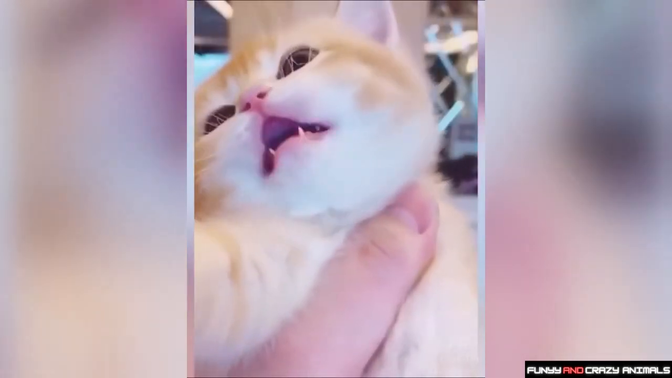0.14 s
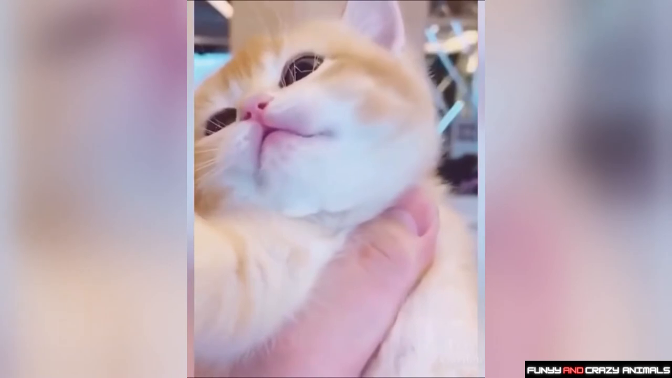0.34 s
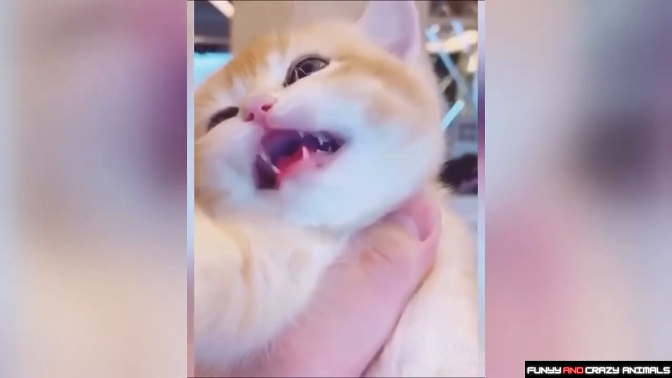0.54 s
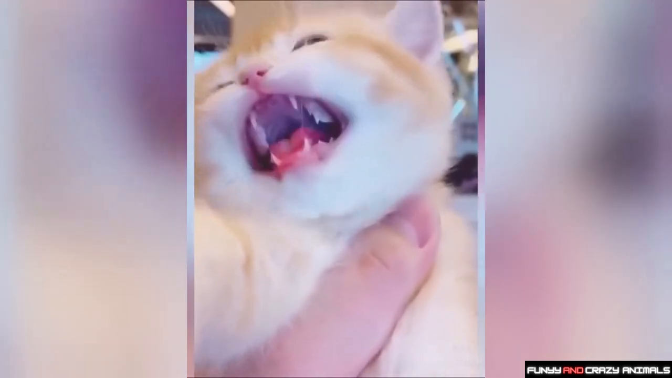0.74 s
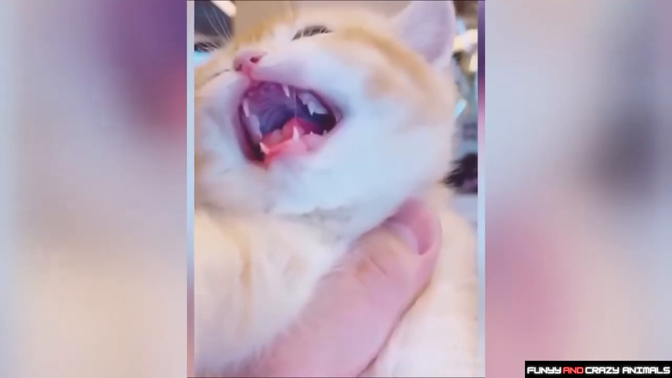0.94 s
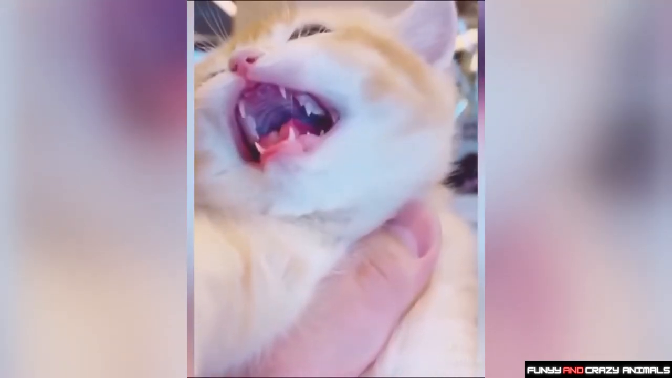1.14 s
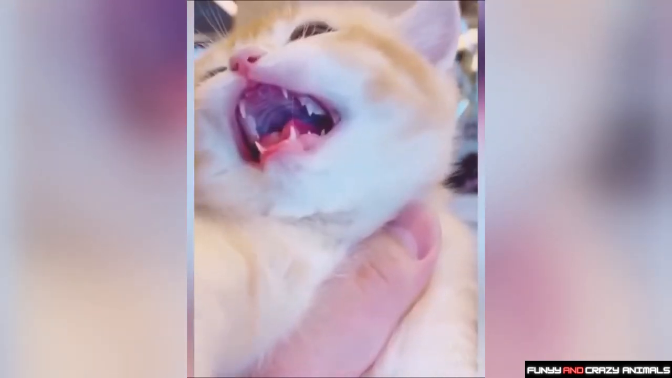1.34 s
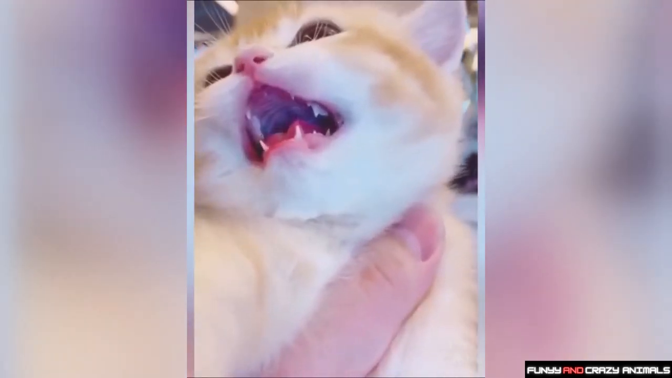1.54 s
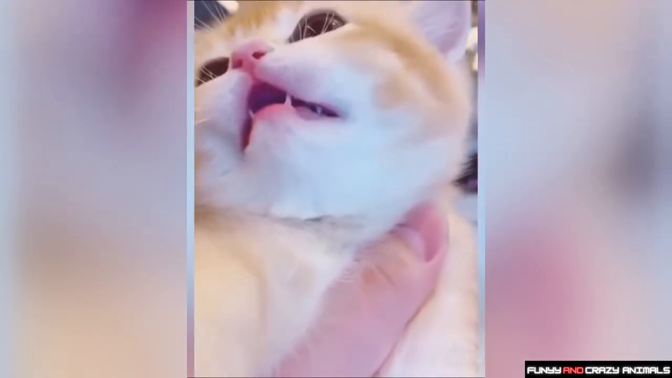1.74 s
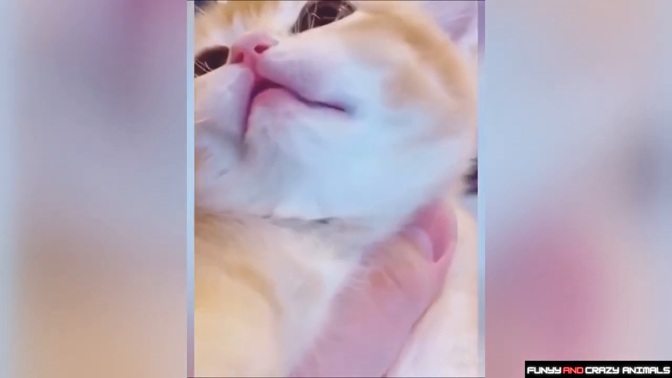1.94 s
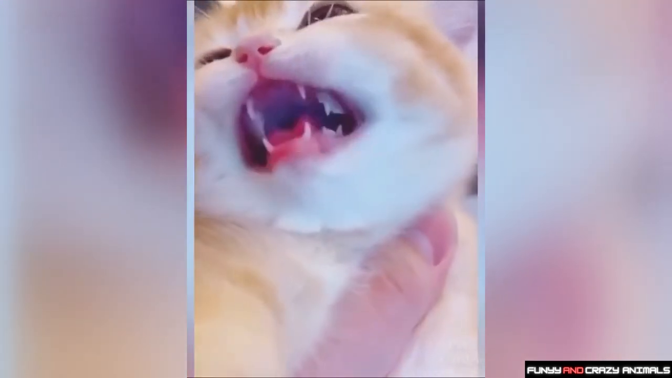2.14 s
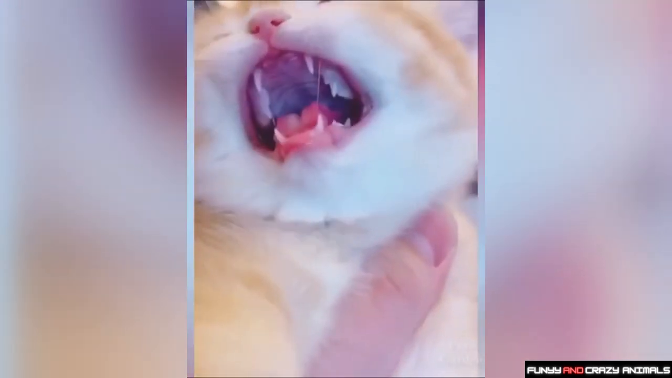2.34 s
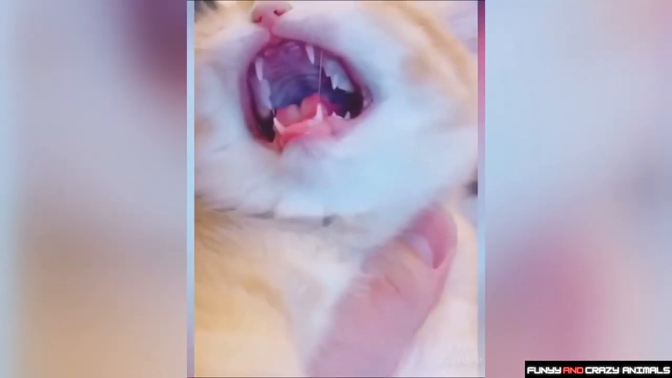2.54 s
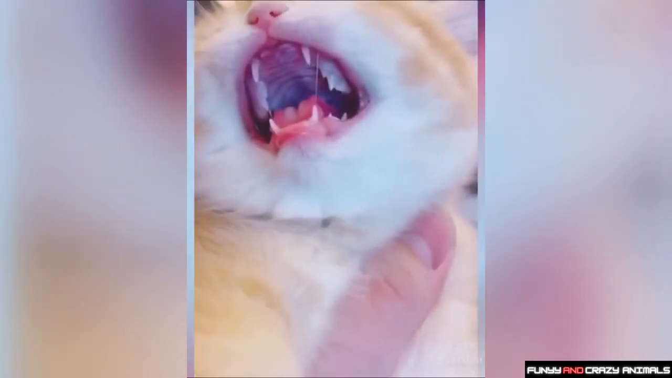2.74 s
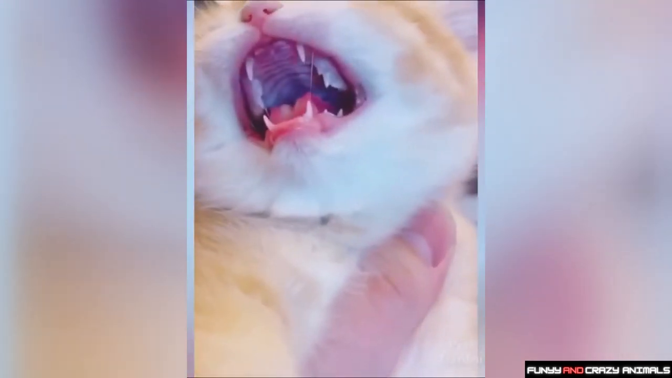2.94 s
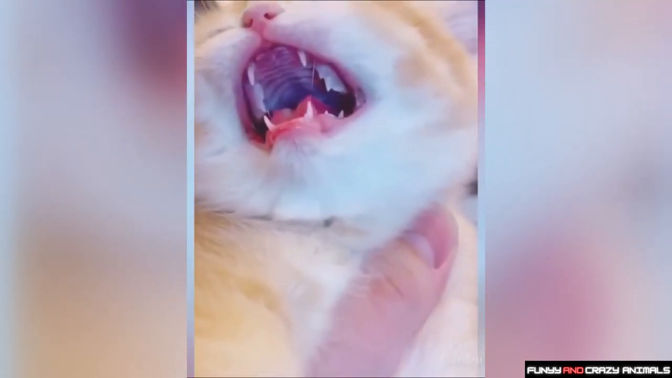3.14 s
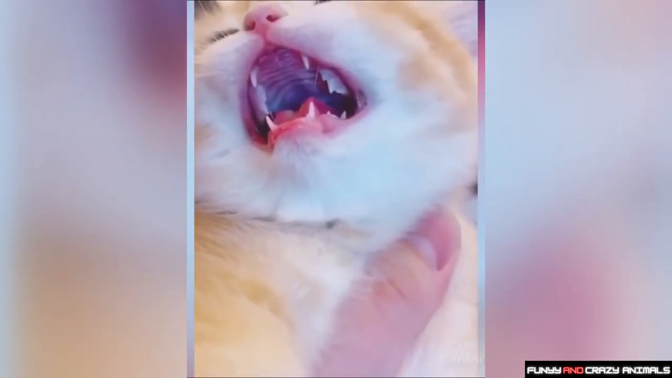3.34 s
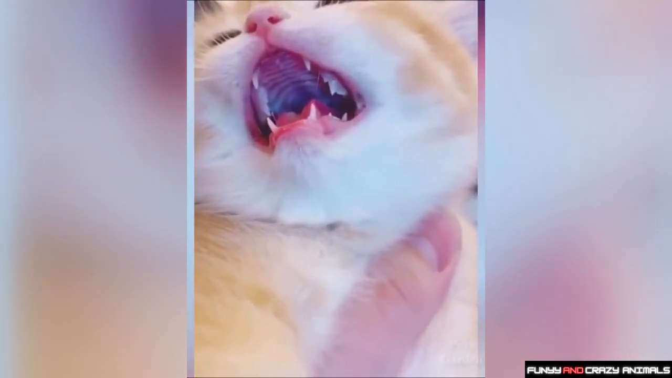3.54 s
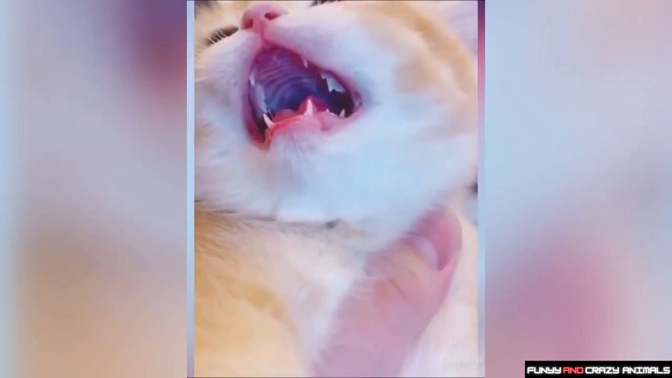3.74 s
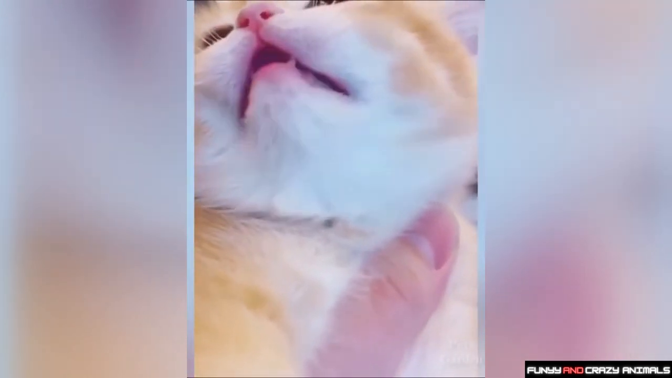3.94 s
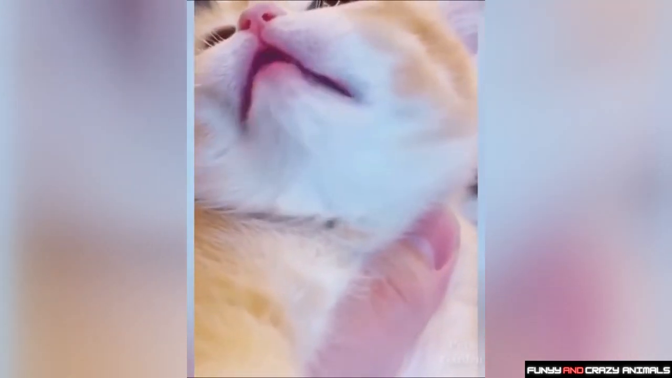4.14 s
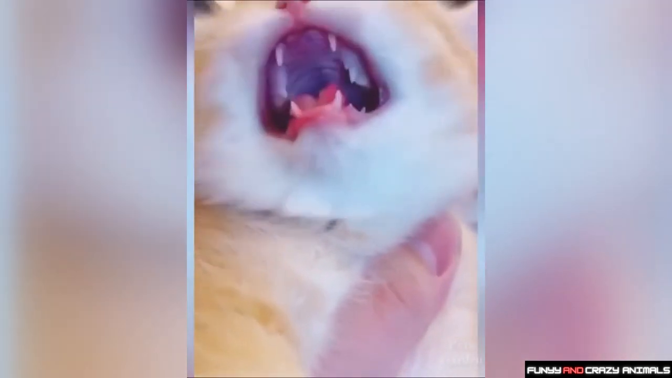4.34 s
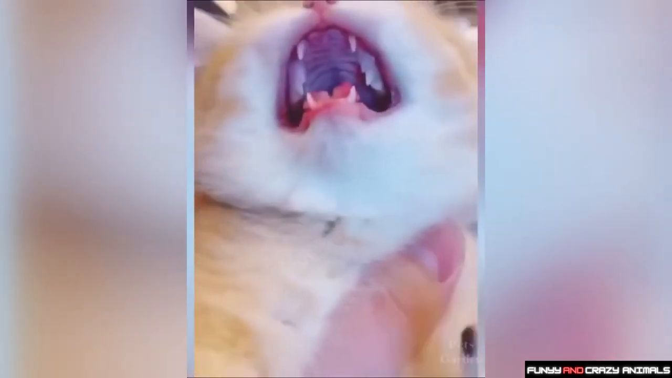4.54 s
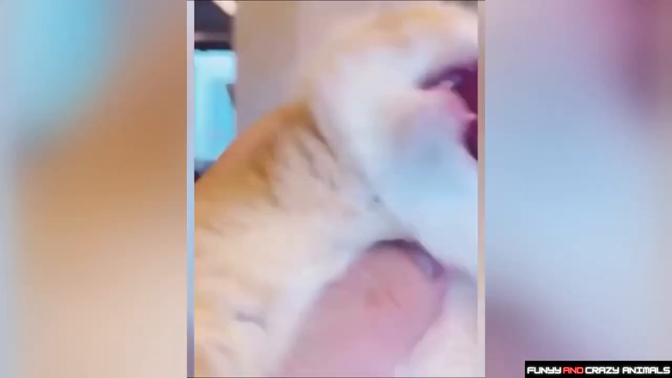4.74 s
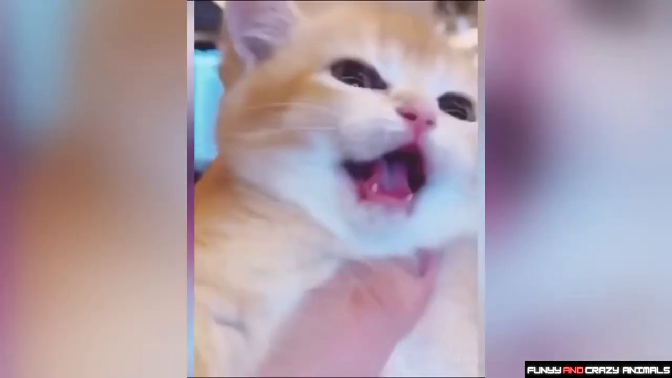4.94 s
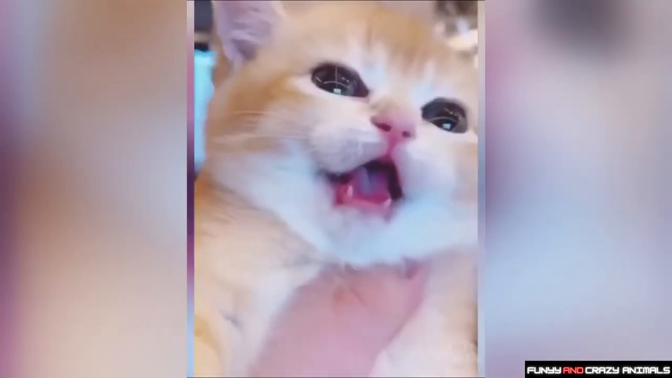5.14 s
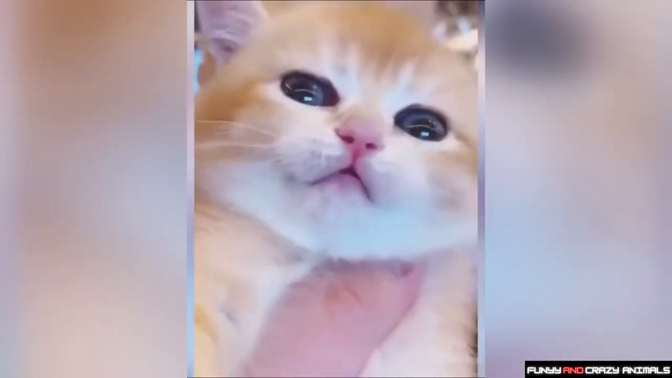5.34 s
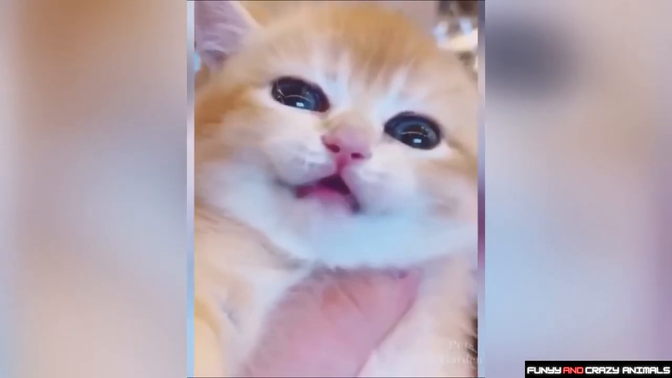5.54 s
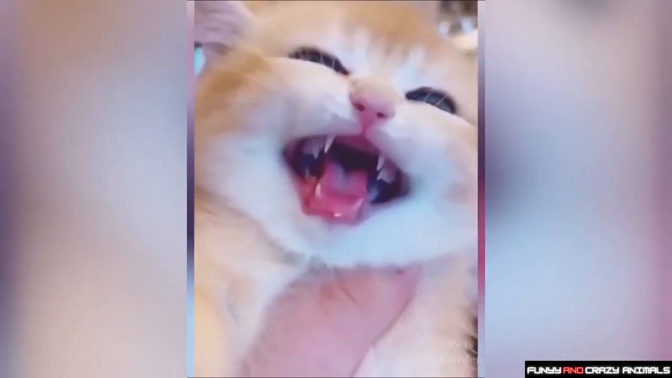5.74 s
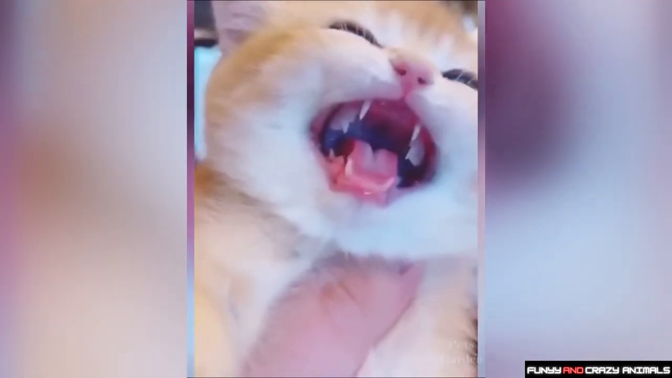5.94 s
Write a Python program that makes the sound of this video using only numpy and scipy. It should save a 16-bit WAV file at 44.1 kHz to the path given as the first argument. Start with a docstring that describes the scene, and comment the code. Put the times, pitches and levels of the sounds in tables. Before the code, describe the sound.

Close, shrill kitten cries repeat indoors, the long ones sinking and dulling, one turning rough and cracked, slightly overloading the microphone.

```python
"""Kitten meows in a small room

A kitten close to the microphone cries in piercing meows over a low room rumble, with tiny wet lip sounds.
Vocal folds: pulse train with half-pitch lines plus pulsing noise, shaped by throat and moving mouth filters.
Cries open on a scrape and end on a croak; the long ones sink in pitch and dull as the jaw closes.
Breaks give strong-weak pulses, most in the fourth cry; noise-tail echoes follow; the microphone overloads."""
import sys
import numpy as np
from scipy import signal
from scipy.fft import rfft, irfft, next_fast_len
from scipy.io import wavfile
from scipy.ndimage import uniform_filter1d

SR = 44100
rng = np.random.default_rng(int(sys.argv[2]) if len(sys.argv) > 2 else 0)


def store_wav(level_fs):
    """Save 16-bit WAV to argv[1]."""
    pcm = np.round(np.clip(np.atleast_2d(level_fs), -1, 1) * 32767)
    wavfile.write(sys.argv[1], SR, pcm.T.astype(np.int16))


N = 263718  # samples


def amp(db):
    """Decibels to gain."""
    return 10 ** (np.asarray(db) / 20)


def evened(x):
    """Scales to rms 1."""
    return x / np.sqrt(np.mean(x ** 2) + 1e-20)


def read(points, hz):
    """Reads a table on a log-frequency axis."""
    f, value = np.transpose(points)
    return np.interp(np.log(hz + 1), np.log(f), value)


def add(mix, s, sound):
    """Adds a sound to the mix at time s."""
    part = mix[:, max(0, round(s * SR)):][:, :sound.shape[-1]]
    part += sound[..., :part.shape[-1]]


def wander(size, hz):
    """Slow chance of rms 1, up to about hz."""
    n = next_fast_len(size + SR // 4, real=True)
    f = np.fft.rfftfreq(n, 1 / SR)
    return evened(irfft(rfft(rng.standard_normal(n)) / (1 + (f / hz) ** 2), n))[:size]


def noise_pair(size, colour, same):
    """Coloured noise for left and right, alike as far as the table `same` says."""
    hz = np.fft.rfftfreq(size, 1 / SR)
    mid, side = rfft(rng.standard_normal((2, size))) * amp(read(colour, hz))
    c = np.clip(read(same, hz), 0, 1)
    mid, side = mid * np.sqrt((1 + c) / 2), side * np.sqrt((1 - c) / 2)
    return irfft(np.array([mid + side, mid - side]), size)


def follow(curve, t):
    """Interpolates every column of a timed curve at the times t."""
    s, *columns = np.transpose(curve)
    return [np.interp(t, s, c) for c in columns]


# voice breaks, folds losing their even beat:
# start_s, end_s, half_pitch_lines_db, added_rasp_db (before AIR_DB), added_brightness_db
VOICE_BREAKS = [(0.558, 0.573, -27, -12, -5), (0.65, 0.646, -13, -27.5, 0), (0.861, 1.07, -36.5, -29.5, 2),
                (1.469, 1.481, -25, -11.5, -13), (1.553, 1.584, -35.5, -16, -11),
                (2.163, 2.171, -8.5, -9.5, -6.5), (2.312, 2.395, -2.5, -18.5, -4),
                (2.447, 2.592, -17.5, -25.5, -1), (3.34, 3.36, -17, -42.5, -2),
                (4.276, 4.334, -1, -33.5, 5), (4.355, 4.489, 3, -34, 4.5), (4.5, 4.609, -3, -40.5, 11.5),
                (4.621, 4.704, -16.5, -33, 10.5), (4.734, 4.765, -27, -35.5, 4.5),
                (4.801, 4.83, 2, -29, -4), (4.923, 4.989, -2, -50, 4.5), (5.66, 5.927, -12, -25.5, 0.5)]
BREAK_RISE_S, BREAK_HEAL_S = 0.014, 0.022


def strain(t, calm_half_db=-43):
    """Breaks set in, hold and heal; returns half-pitch gain, rasp gain, brightness in dB."""
    half, rasp, bright_db = amp(calm_half_db), 0, 0
    for start_s, end_s, half_db, rasp_db, added_db in VOICE_BREAKS:
        rise = np.clip((t - start_s) / BREAK_RISE_S, 0, 1)
        hold = rise * np.exp(-np.maximum(t - end_s, 0) / BREAK_HEAL_S)
        half = half + amp(half_db) * hold
        rasp = rasp + amp(rasp_db) * hold
        bright_db = bright_db + added_db * hold
    return half, rasp, bright_db


# rasp noise spectrum: freq_hz, rel_level_db
RASP_COLOUR = [(400, 0), (1500, -15), (3500, -10), (6000, 6), (12000, 12)]
# left-right likeness of rasp and echoes: freq_hz, likeness_0_to_1
STEREO_LIKENESS = [(4500, .97), (7000, 0.96), (9000, 0)]
EDGE_HZ = 15650  # top of the band
SHIMMER = 0.05  # rms pulse unevenness, share of height
AIR_DB = 18  # added to every rasp level


def folds(hz, half_db, rasp_db, drift=0.0033, rough_jitter=0.062, puff=0.28, unsteady=0.03,
          half_db_per_octave=3, half_full_at=6.9):
    """Vocal folds: a pulse a cycle, alternate ones weaker under strain, and air rasping in step."""
    size = len(hz)
    rough = np.minimum(amp(rasp_db), .5)
    hz = hz * (1 + drift * wander(size, 56) + rough_jitter * rough * wander(size, 230))
    phase = 2 * np.pi * np.cumsum(hz) / SR
    orders = np.arange(1, int(EDGE_HZ / np.median(hz)) + 2)
    tone = sum(np.cos(k * phase) for k in orders)
    # lowest half-pitch lines are weak
    low_db = np.minimum(half_db_per_octave * np.log2(orders / half_full_at), 0)
    halves = sum(g * np.cos((k - .5) * phase) for k, g in zip(orders, amp(low_db)))
    halves = halves * (1 + unsteady * wander(size, 90))
    pulses = (tone + amp(half_db) * halves) * (1 + SHIMMER * wander(size, 59))
    air = noise_pair(size, RASP_COLOUR, STEREO_LIKENESS) * (1 + puff * np.cos(phase))
    return pulses + amp(rasp_db + AIR_DB) * air


# fixed throat colour: freq_hz, gain_db
THROAT_COLOUR = [(400, -28), (800, -8), (1500, .5), (1800, 5), (2100, 0), (2450, -1), (2720, -9),
                 (2950, -3.5), (4000, -7.5), (4700, -21), (6300, -10), (10100, -29), (12300, -16),
                 (13500, -36)]


def tract(source, t, mouth_hz, ring_db, bright_db, half_width_hz=450, bump_db=1.5, bump_above_hz=1400,
          bump_width_hz=400, patchy_db=3.5, size=512):
    """Throat filter, jaw-driven mouth resonance, and brightness trading the fundamental for treble."""
    overlap = size - size // 4
    hz, at, z = signal.stft(source, SR, nperseg=size, noverlap=overlap)
    mouth_hz, ring_db, bright_db = (np.interp(t[0] + at, t, c) for c in (mouth_hz, ring_db, bright_db))
    hz = hz[:, None]
    db = read(THROAT_COLOUR, hz) + ring_db / (1 + ((hz - mouth_hz) / half_width_hz) ** 2)
    # a small bump rides above the mouth resonance
    db = db + bump_db / (1 + ((hz - mouth_hz - bump_above_hz) / bump_width_hz) ** 2)
    # freq_hz, share of bright_db
    db = db + bright_db * read([(950, -0.26), (1600, 0.039), (6000, 0.93), (10000, 0.72)], hz)
    # upper frequencies swell and fade in separate patches
    patches = uniform_filter1d(rng.standard_normal(z.shape[1:]), size=7, axis=0)
    patches = uniform_filter1d(patches, size=30, axis=1)
    db = db + patchy_db * evened(patches) * read([(4000, 0.076), (4800, 1)], hz)
    # minimum phase: resonances ring after each pulse
    log_gain = np.log(amp(np.concatenate([db, db[-2:0:-1]])))
    response = np.exp(np.conj(signal.hilbert(log_gain, axis=0)))[:len(hz)]
    return signal.istft(z * response, SR, nperseg=size, noverlap=overlap)[1][:, :len(t)]


# melody before yelp and quaver, one curve a meow: time_s, pitch_hz
MELODIES = [
    [(0.0, 712), (0.032, 697), (0.052, 608)],
    [(0.54, 858), (0.564, 891), (0.58, 835), (0.642, 795), (0.674, 754.2), (0.77, 762.5), (0.958, 734.7),
     (1.078, 708.3), (1.118, 691.5), (1.334, 677.7), (1.374, 651), (1.465, 660.6), (1.475, 705),
     (1.53, 642.6), (1.58, 623.7), (1.595, 693)],
    [(2.104, 688), (2.185, 812), (2.22, 788), (2.28, 791.7), (2.36, 768.2), (2.56, 779.2), (2.7, 762.2),
     (2.77, 780.5), (2.94, 766), (2.96, 757.3), (3.03, 755), (3.11, 739.2), (3.22, 724.3), (3.26, 743),
     (3.368, 726.5), (3.44, 691), (3.6, 702.2), (3.72, 679)],
    [(4.19, 731), (4.225, 831), (4.27, 824), (4.29, 850), (4.346, 844.7), (4.43, 901.4), (4.47, 899),
     (4.52, 916.6), (4.694, 895.5), (4.73, 968.5), (4.78, 914.5), (4.81, 901), (4.845, 842.5), (4.89, 876),
     (4.97, 890.6), (5.03, 827), (5.085, 744)],
    [(5.545, 780), (5.572, 767), (5.595, 963), (5.628, 849), (5.688, 860), (5.73, 823.6), (5.98, 800)],
]
# jaw, one curve a meow: time_s, mouth_resonance_hz, resonance_height_db
JAWS = [
    [(0.0, 3270, 26.5), (0.025, 3100, 18), (0.05, 1930, -14)],
    [(0.55, 3540, 13), (0.6, 4350, 15), (0.66, 4120, 25.5), (0.73, 3830, 25), (0.83, 3400, 21),
     (0.97, 3115, 20), (1.12, 2920, 17), (1.24, 1750, 4.5), (1.45, 2210, 7), (1.56, 2400, 10.5),
     (1.61, 2320, -13)],
    [(2.07, 3000, 2), (2.11, 3850, 14.5), (2.15, 3930, 6), (2.2, 4140, 13), (2.26, 3860, 10),
     (2.33, 3726, 24.5), (2.53, 3403, 21), (2.72, 3140, 20), (3.05, 2847, 20), (3.36, 2840, 16.5),
     (3.46, 2570, 3.5), (3.62, 1627, 5)],
    [(4.15, 3270, 9), (4.24, 4400, 7.5), (4.29, 4000, 20.5), (4.35, 4110, 23.5), (4.56, 4077, 24.5),
     (4.65, 3566, 20.5), (4.7, 2824, 14.5), (4.73, 1850, 7.5), (4.79, 2020, 9), (4.84, 2260, 18),
     (4.95, 3386, 11.5), (5.02, 2980, 22.5), (5.08, 2217, 8.5)],
    [(5.54, 3320, -14.5), (5.59, 3520, 5.5), (5.66, 3130, 14), (5.73, 3760, 22.5), (5.88, 3400, 21.5),
     (5.96, 3030, 18)],
]
# start_s, end_s, attack_s, effort_gain_db, initial_hold_back_db, brightness_db, dulling_by_end_db,
# rasp_db (before AIR_DB), opening_yelp_share_of_pitch, closing_time_constant_s
CRIES = [(0.0, 0.06, 0.0011, -21.5, 6, -16, -12, -56, 0.043, 0.016),
         (0.54, 1.644, 0.006, -24, 9, 7, 7.5, -31, 0.019, 0.0089),
         (2.064, 3.72, 0.014, -23, 8, 7.5, 11.5, -26.5, 0.49, 0.0093),
         (4.147, 5.093, 0.005, -23, 7.5, 7, 5.5, -31.5, 0.36, 0.056),
         (5.522, 6.02, 0.033, -22.5, 10, -6.5, -4.5, -20.5, 0.036, 0.011)]
YELP_S, SWELL_S = 0.019, 0.13  # yelp drops to the melody; effort builds
SCRAPE_DB, SCRAPE_S = -7.5, 0.02  # rasp as the folds catch, before AIR_DB
CROAK_DB, CROAK_S = 17.5, 0.0058  # rasp as they let go, before AIR_DB
UNSETTLED_DB, QUAVER = 11.5, 0.015  # extra rasp and rms pitch share until effort builds
RELEASE_DB, RELEASE_DULL_DB = 4.5, 26.5  # fade and dulling as the mouth shuts


def meow(row, melody, jaw, cutoff_s=0.012):
    """One cry: scraping yelp, swell to steady effort, gradual tilt in brightness, croak as the mouth shuts."""
    (start_s, end_s, attack_s, effort_db, held_back_db,
     bright_db, dulling_db, rasp_db, yelp, closing_s) = row
    t = np.arange(start_s, end_s, 1 / SR)
    age, left = t - start_s, end_s - t
    half, break_rasp, strain_db = strain(t)
    unsettled, shut = np.exp(-age / SWELL_S), np.exp(-left / closing_s)
    yelp_bend = yelp * np.exp(-(age / YELP_S) ** 2)
    hz = follow(melody, t)[0] * (1 + yelp_bend + QUAVER * unsettled * wander(len(t), 50))
    scrape = amp(SCRAPE_DB) * np.exp(-age / SCRAPE_S)
    croak = amp(CROAK_DB) * np.exp(-left / CROAK_S)
    rasp = amp(rasp_db + UNSETTLED_DB * unsettled) + scrape + break_rasp + croak
    treble_db = bright_db + strain_db - dulling_db * age / (end_s - start_s) - RELEASE_DULL_DB * shut
    level_db = effort_db - held_back_db * unsettled - RELEASE_DB * shut
    source = folds(hz, 20 * np.log10(half), 20 * np.log10(rasp))
    edges = np.clip(np.minimum(age / attack_s, left / cutoff_s), 0, 1)
    voice = tract(source, t, *follow(jaw, t), treble_db)
    return start_s, voice * amp(level_db) * edges


# rumble spectrum: freq_hz, rel_level_db
RUMBLE_COLOUR = [(55, -1.5), (160, -6), (420, -20.5), (800, -27), (12000, -42)]
# rumble rise: time_s, level_db (before swell)
RUMBLE_RISE = [(0.398, -59.5), (0.798, -53)]


def rumble(swell_db=3):
    """Room background: low coloured noise with a randomly wandering level."""
    level_db = np.interp(np.arange(N) / SR, *np.transpose(RUMBLE_RISE)) + swell_db * wander(N, 9.9)
    return amp(level_db) * evened(noise_pair(N, RUMBLE_COLOUR, [(60, 0.96)]))


# room decay: freq_hz, t60_s
ROOM_DECAY = [(500, 0.23), (3000, 0.37), (6000, 0.043)]


def echoes(x, colour, t60, first_s=.003):
    """Dense reflections: convolution with coloured noise, each band dying at its own speed."""
    hz, t, z = signal.stft(noise_pair(SR, colour, STEREO_LIKENESS), SR, nperseg=256)
    fade = amp(-60 * t / read(t60, hz)[:, None]) * (t > first_s)
    fade /= np.sqrt((fade ** 2).sum(1, keepdims=True) * t[1] * SR)  # equal decay energy per band
    tail = signal.istft(z * fade, SR, nperseg=256)[1]
    return signal.fftconvolve(x, tail, axes=1)[:, :N]


# wet sounds as the mouth opens: start_s, level_db (before decay), centre_hz, decay_s
LIP_TICKS = [(0.489, -49.5, 1939, 0.1), (2.043, -42.5, 7680, 0.018), (4.123, -32.5, 8360, 0.0057)]


def lip_sound(db, hz, decay_s, rise_share=0.21):
    """Tiny wet tick or smack: band-passed noise, quick rise, exponential decay."""
    t = np.arange(SR // 10) / SR
    band = signal.butter(2, [hz / 2, min(hz * 2, SR / 2 - 1)], "bandpass", fs=SR)
    shape = np.minimum(t / (rise_share * decay_s), 1) * np.exp(-t / decay_s)
    noise = signal.lfilter(*band, rng.standard_normal(len(t)))
    return amp(db) * evened(noise) * shape


def scene():
    """Kitten close by, quick bright reflections from near surfaces, room tail and rumble."""
    cat = np.zeros((2, N))
    for cry in zip(CRIES, MELODIES, JAWS):
        add(cat, *meow(*cry))
    for start_s, *lip in LIP_TICKS:
        add(cat, start_s, lip_sound(*lip))
    # colours: freq_hz, level_db; decay: freq_hz, t60_s
    near = echoes(cat, [(3500, -13.0), (6000, -3.0), (11000, -19.5)], [(6000, 0.095)])
    far = echoes(cat, [(3000, -12.0), (6000, -7.0)], ROOM_DECAY)
    return cat + near + far + rumble()


def record(dry, ceiling=0.84, lean=0.055, knee=8):
    """Microphone overload: peaks flatten at a lopsided ceiling, then the band is limited."""
    limit = ceiling + lean * np.sign(dry)
    x = dry / (1 + abs(dry / limit) ** knee) ** (1 / knee)
    x = signal.lfilter(*signal.butter(1, 20, "highpass", fs=SR), x)
    low_pass = signal.firwin(511, EDGE_HZ, window=("kaiser", 9), fs=SR)
    return signal.oaconvolve(x, low_pass[None], "same")


dry = scene()
out = record(dry)
store_wav(out)
```